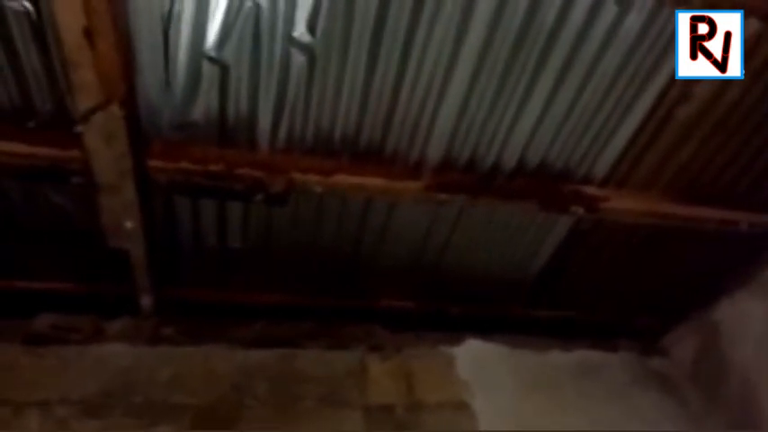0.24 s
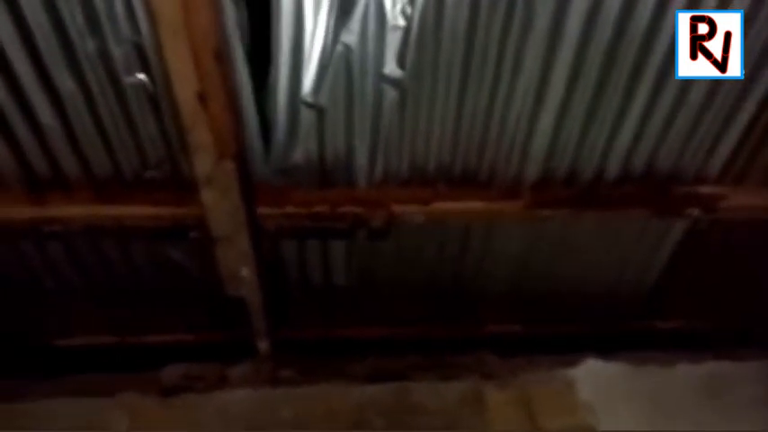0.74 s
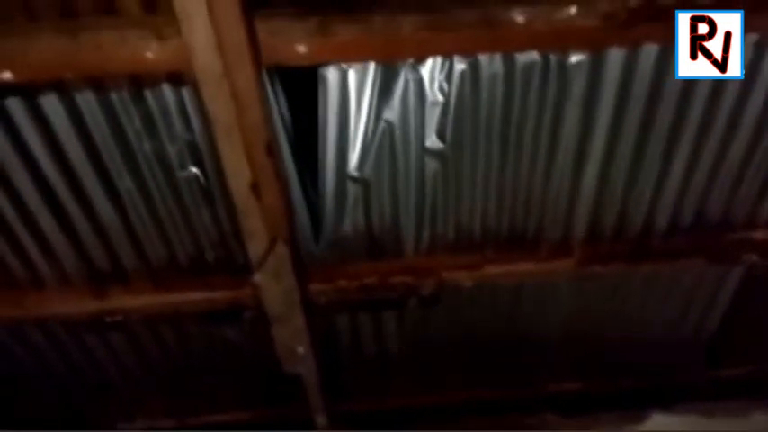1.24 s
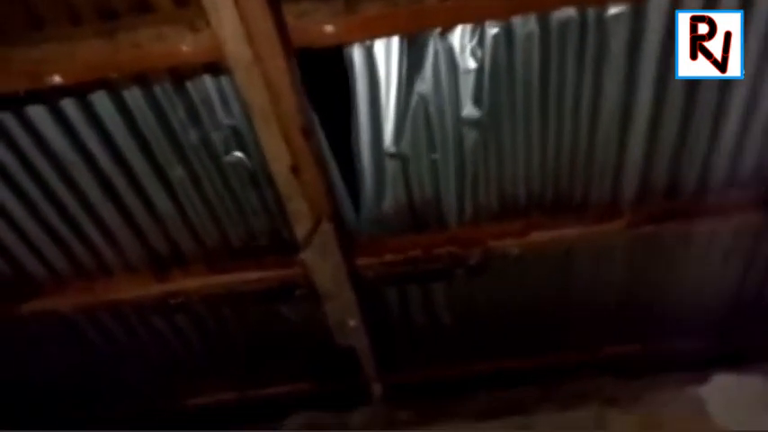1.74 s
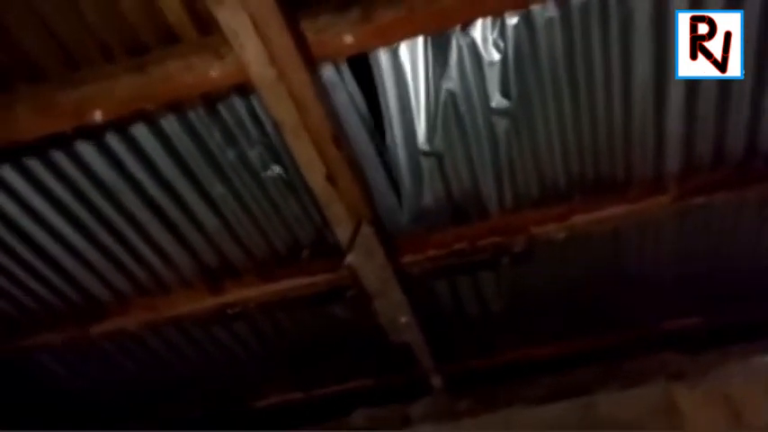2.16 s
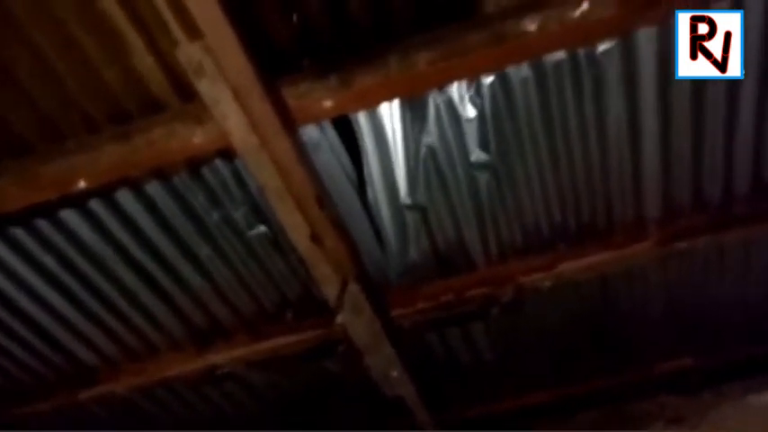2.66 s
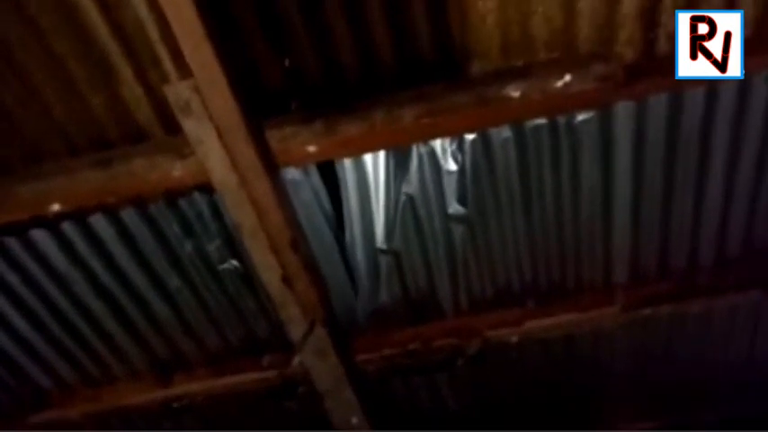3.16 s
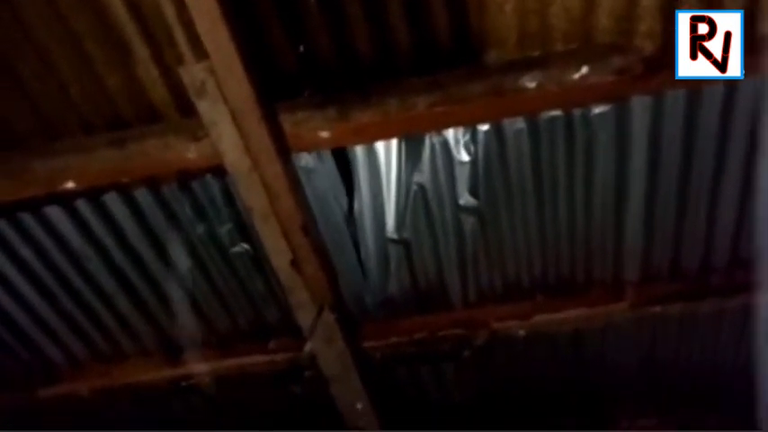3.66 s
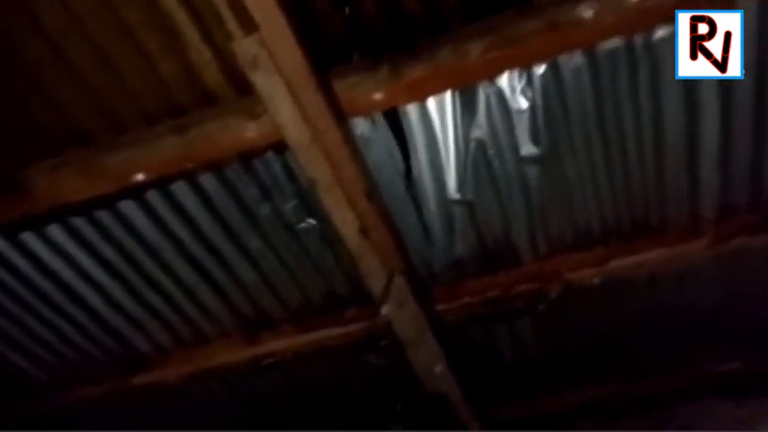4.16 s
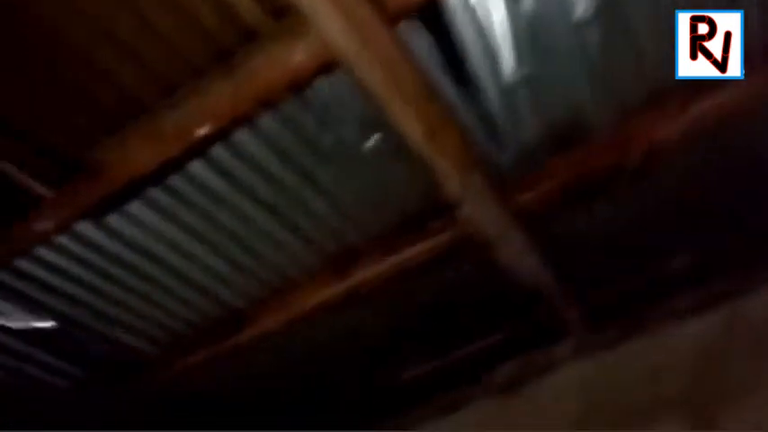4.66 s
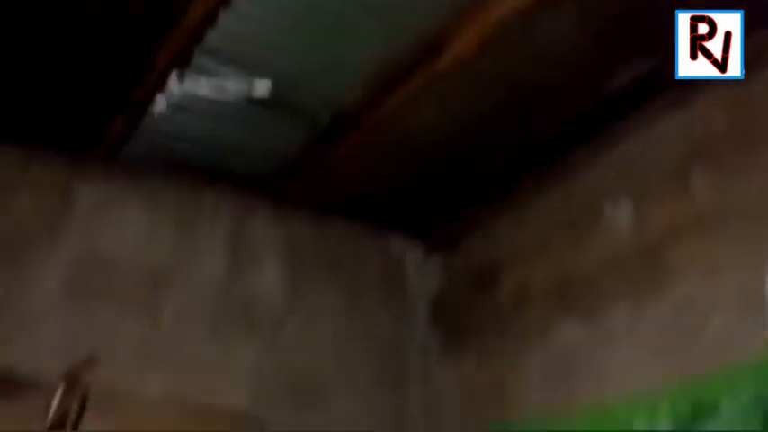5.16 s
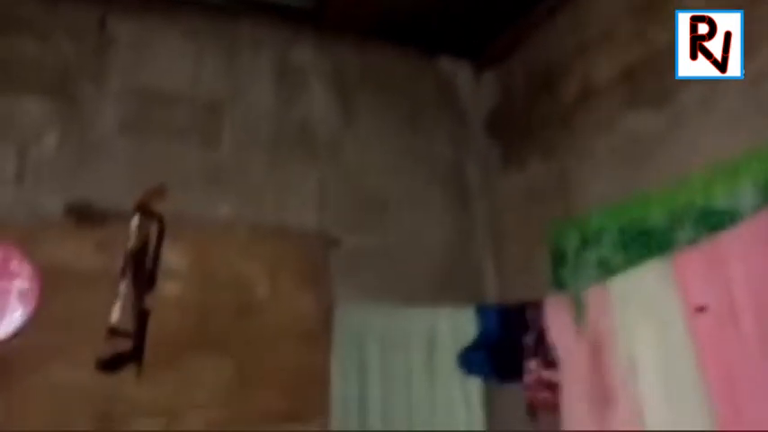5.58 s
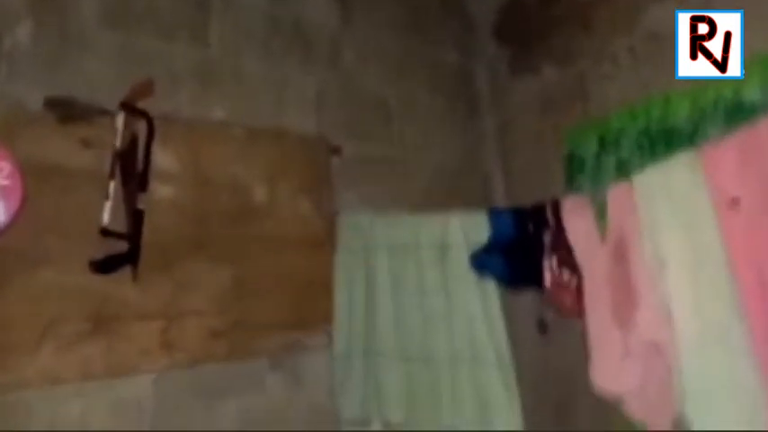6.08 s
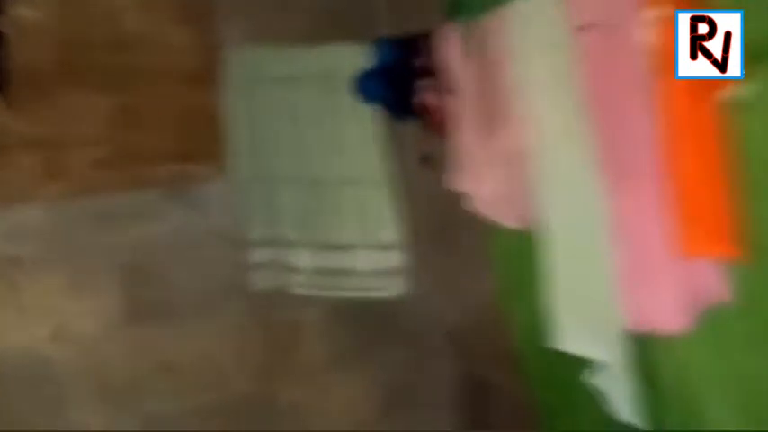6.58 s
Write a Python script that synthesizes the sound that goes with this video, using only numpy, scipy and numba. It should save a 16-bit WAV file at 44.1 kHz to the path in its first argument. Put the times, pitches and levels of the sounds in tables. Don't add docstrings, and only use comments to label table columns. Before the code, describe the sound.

A storm shakes a tin roof overhead. Uneven bursts of rain ring the thin metal and spray hisses, while wind hums low in the hard-walled room. Loose sheets flap, click, knock and bang in irregular clusters, busiest in the first two and a half seconds and around five seconds. Late on, a bending sheet groans very briefly before more sharp slaps. Close, short room echo and rough phone sound.

```python
import sys
import numpy as np
from scipy import signal
from scipy.fft import rfft, irfft, next_fast_len
from scipy.io import wavfile
from scipy.ndimage import uniform_filter1d, map_coordinates
from numba import njit

SR = 44100
rng = np.random.default_rng(int(sys.argv[2]) if len(sys.argv) > 2 else 0)


def int16_out(signal):
    q = np.round(np.clip(np.atleast_2d(signal).T, -1, 1) * 32767)
    wavfile.write(sys.argv[1], SR, q.astype(np.int16))


def convert_level_to_amplitude(level_db):
    exponent = np.asarray(level_db, float) / 20
    return 10 ** exponent


N = 301203

# peak_s, drumming_db, half_width_s, relative_brightness_db
SQUALLS = [(0.17, -32, 0.028, 3), (0.46, -22.5, 0.12, -1.5), (0.615, -21.5, 0.045, -2),
           (0.78, -21.5, 0.13, 1.2), (1.01, -20, 0.047, -5.5), (1.23, -25, 0.025, -14),
           (1.49, -21, 0.11, -0.3), (1.739, -19.5, 0.033, -3), (1.99, -21.5, 0.29, -1.5),
           (2.191, -18, 0.053, -2.5), (2.4, -20, 0.043, -4), (2.7, -26, 0.018, -13),
           (2.9, -26.5, 0.038, -0.5), (3.16, -28, 0.039, -3), (3.5, -23.5, 0.029, -4.5),
           (3.669, -24.5, 0.049, 2), (3.76, -22, 0.14, -7), (4.1, -24.5, 0.093, -2),
           (4.41, -22.5, 0.17, -3), (4.481, -22, 0.034, -1), (4.73, -29, 0.095, 2),
           (4.82, -21.5, 0.026, -3.5), (5.06, -17, 0.15, -3), (5.16, -21, 0.031, 1.5),
           (5.38, -24, 0.054, 0), (5.549, -25.5, 0.071, 1), (5.822, -22, 0.061, -2.5),
           (6.21, -22.5, 0.064, -7.5), (6.4, -21.5, 0.074, -6.5), (6.6, -19.5, 0.075, 0),
           (6.595, -20, .025, 2)]
# frequency_hz, density_db (dB per Hz)
DRUMMING = [(700, -21), (1000, -14.5), (1200, 0.5), (1600, -3.5), (1800, -4.5), (2050, -4.5), (2500, -6.5),
            (2850, -12.5), (3250, -22), (3750, -15), (4900, -27.5), (5600, -28), (7000, -28.5),
            (9000, -41.5)]
# frequency_hz, density_db (dB per Hz)
SPRAY = [(2500, -17.5), (3800, 6), (4900, -4.5), (5600, 0.5), (7000, -6), (9500, 0), (11700, -5.5),
         (12500, -11)]


def unit(x):
    return x / np.sqrt(np.mean(x ** 2) + 1e-20)


def along(points, hz):
    f, v = np.transpose(points)
    return np.interp(np.log(hz + 1), np.log(f + 1), v)


def wobble(rate_hz):
    knots = rng.standard_normal(int(N * rate_hz / SR) + 4)
    return map_coordinates(knots, [np.arange(N) * rate_hz / SR])


def filtered(x, response):
    m = next_fast_len(N + SR // 2)
    return irfft(rfft(x, m) * response(np.fft.rfftfreq(m, 1 / SR)), m)[..., :N]


def coloured(x, spectrum):
    return unit(filtered(x, lambda hz: convert_level_to_amplitude(along(spectrum, hz))))


def rush(patchy_db):
    z = signal.stft(rng.standard_normal(N + 512), nperseg=512)[2]
    field = uniform_filter1d(rng.standard_normal(z.shape), size=6, axis=0)
    field = uniform_filter1d(field, size=8, axis=1)
    return unit(signal.istft(z * convert_level_to_amplitude(patchy_db * unit(field)), nperseg=512)[1][:N])


def swells(base_db, peak_s, db, width_s, rise_share=.88):
    t = np.arange(0, N + 64, 64) / SR
    rise = np.clip(np.reshape(rise_share, (-1, 1)), .1, 1.9)
    u = (t - peak_s[:, None]) / np.clip(width_s, .01, 1)[:, None] + 1 - rise
    bells = convert_level_to_amplitude(2 * db) @ np.exp(-(u / np.where(u < 0, rise, 2 - rise)) ** 2)
    return 10 * np.log10(convert_level_to_amplitude(2 * base_db) + np.interp(np.arange(N) / SR, t, bells))


@njit
def add(out, start, step, fade, size, rise):
    for k in range(len(start)):
        for i in range(min(int(6 / fade[k]), len(out) - start[k])):
            envelope = size[k] * np.exp(-fade[k] * i) * (1 - np.exp(-i / rise))
            out[start[k] + i] += envelope * np.sin(step[k] * i)


def rings(start_s, hz, t60_s, size, attack_s):
    out = np.zeros(N)
    start = np.clip(start_s * SR, 0, N - 1).astype(np.int64)
    add(out, start, 2 * np.pi * hz / SR, np.log(1000) / (t60_s * SR), size, attack_s * SR)
    return out


def struck(start_s, db, hz, spread, t60_s, attack_s, count):
    detune, loud, life, delay = np.moveaxis(rng.standard_normal((len(start_s), count, 4)), 2, 0)
    detune[:, 0] = 0
    size = convert_level_to_amplitude(db[:, None] + 2.7 * loud - 5.4 * np.abs(detune)) / np.sqrt(count)
    late_s = start_s[:, None] + .004 * np.abs(delay)
    mode_hz = hz[:, None] * np.exp(spread * detune)
    mode_t60_s = t60_s * np.exp(0.34 * life)
    return rings(late_s.ravel(), mode_hz.ravel(), mode_t60_s.ravel(), size.ravel(), attack_s)


def bursts(start_s, db, t60_s, attack_s):
    t = np.arange(SR // 4) / SR
    out = np.zeros(N + len(t))
    for start, level, life in zip(start_s, db, t60_s):
        out[round(start * SR):][:len(t)] += convert_level_to_amplitude(level - 60 * t / life) * (1 - np.exp(-t / attack_s))
    return out[:N]


def drops(lo_hz, hi_hz, cycles, spread_db, count):
    when, pitch, life, big = rng.random((count, 4)).T
    hz = lo_hz + pitch * (hi_hz - lo_hz)
    t60_s = cycles * (0.3 + 3.6 * life) / hz
    size = convert_level_to_amplitude(-spread_db * np.log(big + 1e-4)) / np.sqrt(t60_s)
    return unit(rings(when * N / SR, hz, t60_s, size, attack_s=0.00012))


def rain():
    # time_s, strength_db
    downpour = [(0, -25), (.85, -24.5), (1.7, -29), (2.56, -28.5), (3.4, -30), (4.2, -29), (5.6, -30),
                (5.98, -25.5), (6.3, -27), (6.7, -30.5), (6.83, -26.5)]
    # middle_s (of the whole surge), level_db, half_width_s, rise_share (of
    splashes = [(0.31, -38, 0.033, 0.8), (0.47, -35, 0.058, 0.61), (0.6, -31, 0.025, 0.15),
                (0.79, -32.6, 0.1, 1), (1.0, -37, 0.053, 0.68), (1.49, -32, 0.036, 0.8),
                (1.49, -36.5, 0.087, 0.8), (1.95, -38.5, 0.23, 0.71), (2.23, -31.5, 0.065, 0.94),
                (2.7, -44.5, 0.029, 0.8), (2.87, -43.5, 0.05, 0.59), (3.14, -47.5, 0.027, 0.35),
                (3.38, -45.5, 0.032, 0.8), (3.66, -42, 0.06, 0.35), (4.06, -43.5, 0.06, 0.35),
                (4.3, -44.5, 0.059, 0.88), (4.46, -38.5, 0.026, 0.87), (4.55, -43.5, 0.074, 0.87),
                (5.079, -37, 0.13, 0.7), (5.16, -33, 0.038, 0.78), (5.371, -38.5, 0.035, 0.29),
                (5.55, -43.5, 0.085, 0.8), (5.84, -37, 0.049, 0.35), (6.16, -44, 0.016, 0.35),
                (6.2, -48, 0.2, 1), (6.4, -43, 0.058, 0.88), (6.58, -40.5, 0.035, 0.99),
                (6.785, -46.5, 0.023, 0.73)]
    # peak_s, level_db, half_width_s
    heaves = [(.12, -35.5, .2), (.5, -37, 0.11), (1.2, -34, 0.072), (2.6, -35, .06), (0.75, -34, 0.29),
              (1.03, -31, 0.049), (1.76, -28.5, 0.08), (2.03, -32.5, 0.11), (2.17, -27.5, 0.035),
              (2.4, -34, .036), (2.87, -35, .048), (3.69, -28.5, 0.048), (3.76, -29, 0.18),
              (4.3, -33.5, 0.37), (4.85, -30, 0.068), (5.04, -27, 0.1), (6.14, -31.5, 0.082),
              (6.61, -29, 0.063)]
    # frequency_hz, density_db (dB per Hz)
    panel_colour = [(150, -18), (220, -1), (400, 2.5), (700, 3.5), (1050, 5), (1500, -33)]

    steady_db = np.interp(np.arange(N) / SR, *np.transpose(downpour))
    peak_s, db, width_s, bright_db = np.transpose(SQUALLS)
    dull_db = swells(steady_db, peak_s, db, width_s)
    sharp_db = swells(steady_db - 3, peak_s, db + bright_db, width_s)
    spray_db = swells(-50 + (steady_db + 28), *np.transpose(splashes))
    panel_db = swells(-35 + 0.27 * (dull_db + 26), *np.transpose(heaves))
    flurry = wobble(28)

    ringing = drops(800, 7200, cycles=130, spread_db=2.0, count=24000)
    taps = drops(800, 7200, cycles=3.5, spread_db=1.03, count=16000)
    taps = convert_level_to_amplitude(.3 * (dull_db + 24)) * taps
    drum = coloured(.75 * ringing + .42 * taps + .75 * rush(patchy_db=-0.55), DRUMMING)
    dull = filtered(drum, lambda f: 1 / (1 + (f / 1800) ** 8))
    drum = unit(dull) * convert_level_to_amplitude(dull_db - 0.98) + unit(drum - dull) * convert_level_to_amplitude(sharp_db - 0.58)

    body = .4 * drops(199.5, 1201, cycles=34, spread_db=1.5, count=3000)
    body = coloured(body + .9 * rush(patchy_db=-1.2), panel_colour)
    spray = .45 * drops(3300, 12850, cycles=60, spread_db=-1.0, count=20000)
    spray = coloured(spray + 1.1 * rush(patchy_db=-1.5), SPRAY)

    mix = drum * convert_level_to_amplitude(.25 * flurry)
    mix += spray * convert_level_to_amplitude(spray_db + 1.5 * flurry + 7.0)
    return mix + body * convert_level_to_amplitude(panel_db + 0.31 * flurry - 1.5)


def lulls():
    # end_s, depth_db, length_s
    sags = [(.579, 6, .016), (1.383, 2, .03), (2.128, 2, .025), (2.365, 2, .03), (3.126, 3, .015),
            (3.63, 1.5, .03), (4.688, 5, .015), (5.1, 2, .015), (5.778, 1.5, .03), (6.49, 3, .03)]
    # start_s, depth_db, length_s
    breaks = [
        (.855, 2.5, .05),
        (5.197, 4, .04),
        (6.68, 2, .08),
        (4.838, 2, .03),
    ]
    t = np.arange(N) / SR

    def dip(s, db, length):
        return db * np.exp(-((t - s) / length) ** 2)

    depth_db = sum(dip(*row) * (t < row[0]) for row in sags)
    depth_db = depth_db + sum(dip(*row) * (t > row[0]) for row in breaks)
    return convert_level_to_amplitude(-uniform_filter1d(depth_db, size=200))


def wind():
    # frequency_hz, density_db (dB per Hz)
    rumble = [(14, -26), (30, -20), (60, -7), (100, -12.5), (200, -14.5), (400, -13.5), (900, -16),
              (1500, -39.5)]
    # centre_hz, width_hz, gain_db
    room_modes = [(116, 15, 11), (167, 36, 11), (349.3, 6.4, 9)]
    # pitch_hz, relative_db, wander_hz
    hum_tones = [(121.8, -8.5, 5.61), (100.2, -9.5, 5.99), (169.5, -14, 2.83), (355, -18, 3.5),
                 (610.7, -15, 4.08)]

    def resonance(f):
        peaks = sum(convert_level_to_amplitude(2 * db) / (1 + (2 * (f - c) / w) ** 2) for c, w, db in room_modes)
        return np.sqrt(1 + peaks)

    drone = unit(filtered(coloured(rush(patchy_db=0.56), rumble), resonance))
    hum = np.zeros(N)
    for hz, db, wander_hz in hum_tones:
        turns = np.cumsum(hz + wander_hz * wobble(12)) / SR
        hum += convert_level_to_amplitude(db + 2.0 + 3 * wobble(4)) * np.sin(2 * np.pi * turns)
    gust_db = swells(-27.0, *np.transpose(SQUALLS)[:3])
    level_db = -35 + 0.23 * (np.arange(N) - N / 2) / SR
    level_db = level_db + 0.74 * wobble(2.0) - .15 * (gust_db + 22)
    return convert_level_to_amplitude(level_db) * (0.99 * drone + hum)


def clangs():
    # start_s, peak_db, pitch_hz, t60_s
    clear_rings = [(1.714, -11, 1800, 0.095), (1.716, -15.5, 2790, 0.086), (5.1, -16, 1130, 0.061),
                   (1.6, -20, 330, 0.056), (1.72, -22, 780, 0.043), (3.6, -10, 1800, 0.051),
                   (6.7, -16, 2100, 0.049), (5.002, -9, 454, 0.038), (5.003, -10, 350, 0.039),
                   (5.048, -7.5, 450, 0.033), (5.3, -20, 250, 0.08), (0.0497, -28, 169, 1)]
    s, db, hz, t60_s = np.transpose(clear_rings)
    return rings(s, hz, t60_s, convert_level_to_amplitude(db), attack_s=0.0044)


def ticks():
    # start_s, peak_db
    tick_rows = [(0.0682, -26.5), (0.1526, -25.5), (0.484, -19), (0.5806, -22), (0.7253, -20),
                 (0.7654, -19), (0.833, -15), (0.9418, -28), (1.1039, -32), (1.4533, -17.5), (1.596, -23),
                 (2.809, -31), (3.1278, -26.5), (3.5877, -25), (3.631, -31), (3.701, -24), (3.9926, -26.5),
                 (4.0735, -25.5), (4.1999, -28), (4.4313, -31), (4.7785, -30), (4.982, -20.5), (5.356, -20),
                 (5.7808, -21), (6.1504, -24.5), (6.771, -32)]
    s, db = np.transpose(tick_rows)
    metal = struck(s, db, np.full(len(s), 10000.), spread=0.17, t60_s=0.054, attack_s=0.0012, count=30)
    water = bursts(s, db - 7.5, np.full(len(s), .05), attack_s=.001)
    return metal + water * coloured(rng.standard_normal(N), SPRAY)


def slapped(rows, treble_db):
    s, db, hz = np.transpose(rows)
    t60_s = np.full((len(s), 1), .085)
    clang = struck(s, db - 8.5, hz, spread=.12, t60_s=1.4 * t60_s, attack_s=0.0027, count=9)
    crash = bursts(s, db - 13.5, t60_s[:, 0], attack_s=0.0044)
    crash = crash * coloured(rng.standard_normal(N), DRUMMING)
    treble = struck(s, db + treble_db - 10.0, np.full(len(s), 4400.), spread=0.22, t60_s=t60_s,
                    attack_s=0.0027, count=16)
    return clang + crash + treble


def slaps():
    # start_s, peak_db, loudest_ring_hz
    edge_rows = [(0.1317, -17, 1310), (0.58, -17, 1260), (0.7258, -8, 1347), (0.7751, 1, 1180),
                 (1.3865, -3.5, 1635), (1.6467, -13, 1265), (2.1282, -5.5, 1310), (3.028, -18, 1200),
                 (4.1092, -6.5, 1168), (4.2562, -12, 1454), (4.4077, -13, 1440), (4.6887, -4.5, 1154),
                 (4.9022, -10, 1495), (5.0108, -3, 1250), (5.3584, -4.5, 1540), (5.5234, -4.5, 1460),
                 (5.701, -12, 1395), (5.7794, -3.5, 1296), (6.3672, -8, 1365), (6.547, -9.5, 1460),
                 (6.584, -3, 2033), (6.632, -7, 1760), (2.168, -5.5, 1204), (2.197, -6, 1200)]
    # start_s, peak_db, loudest_ring_hz
    flap_rows = [(0.4833, -10, 1260), (1.1015, -8, 1188), (1.1633, -14, 1190), (1.276, -16, 1420),
                 (1.482, -5.5, 1453), (1.572, -12, 1192), (2.0073, -3, 2070), (2.367, -0.5, 1477),
                 (2.6272, -11, 1970), (2.6911, -14, 1230), (2.737, -16, 1470), (3.465, -10, 2150),
                 (3.5724, -12, 1460), (3.7224, -5.5, 1230), (3.7688, -5.5, 1352), (3.845, -12.5, 1520),
                 (3.919, -8.5, 1234), (4.0683, -21, 1370), (4.3642, -6.5, 1117), (4.4453, -3.5, 2170),
                 (5.1046, -6, 1254), (5.899, -6.5, 1400), (5.9858, -3.5, 1394), (6.178, -8, 1220),
                 (6.2538, -9.5, 1490), (6.6983, -7.5, 1310)]
    return slapped(edge_rows, treble_db=-9.5) + slapped(flap_rows, treble_db=-21.5)


def knocks():
    # start_s, peak_db
    knock_rows = [(0.316, -12), (0.418, -12), (0.4878, -13), (0.5013, -16), (0.5422, -9), (0.5801, -9),
                  (0.697, -9), (0.7758, -7), (0.8699, -14.5), (0.9423, -13), (1.011, -14), (1.4043, -12),
                  (1.449, -9), (1.505, -5), (1.5723, -14), (1.701, -12), (1.717, -8), (1.887, -15),
                  (1.9121, -10), (1.953, -11), (1.9745, -9), (2.0063, -13), (2.1211, -13), (2.1693, -7),
                  (2.197, -6), (2.354, -13), (2.365, -12), (2.6278, -17), (3.1103, -18), (3.1685, -18),
                  (3.4655, -19), (3.6394, -14), (3.8985, -18), (4.3091, -15), (4.3465, -19), (4.366, -8.5),
                  (4.4177, -16), (4.4493, -9), (4.6907, -13), (4.7185, -12), (4.814, -12), (4.82, -13),
                  (4.8984, -15), (4.9062, -12), (4.957, -12), (4.963, -7), (4.9938, -8), (5.1236, -9),
                  (5.3535, -8.5), (5.525, -16), (5.5253, -13.5), (5.5677, -11), (5.7, -19), (6.3814, -13),
                  (6.568, -7), (6.5832, -4)]
    # frequency_hz, density_db (dB per Hz)
    knock_colour = [(600, -17.5), (1200, -1), (2500, -0.5), (3250, -13.5), (3800, -10), (5000, -19),
                    (9000, -23.5)]
    s, db = np.transpose(knock_rows)
    contour = bursts(s, db - 4, np.full(len(s), .014), attack_s=.0004)
    return contour * coloured(rng.standard_normal(N), knock_colour)


def bangs():
    # start_s, peak_db, ring_hz, t60_s
    bang_rows = [(1.699, -27, 510, 0.066), (1.758, -18, 320, 0.07), (2.145, -8, 547, 0.058),
                 (2.17, -14, 850, 0.07), (3.635, -10, 726, 0.048), (3.68, -16, 267, 0.091),
                 (3.699, -18, 537, 0.06), (3.837, -19, 650, 0.05), (4.503, -21, 624, 0.048),
                 (5.003, -8.5, 293, 0.06), (5.02, -12, 240, .06), (5.051, -17, 442, 0.055),
                 (5.697, -19, 342, 0.043), (6.135, -21, 640, 0.07), (6.597, -15, 560, 0.063),
                 (6.635, -12, 580, 0.076)]
    # frequency_hz, density_db (dB per Hz)
    thud_colour = [(150, -27), (240, -3), (500, -2), (1000, -1), (1600, -27)]
    s, db, hz, t60_s = np.transpose(bang_rows)
    ring_t60_s = np.clip(t60_s, .02, .3)[:, None]
    ring = struck(s, db - 5.5, hz, spread=0.2, t60_s=ring_t60_s, attack_s=0.002, count=14)
    thud = bursts(s, db - 14.5, 1.2 * t60_s, attack_s=.003)
    return ring + thud * coloured(rng.standard_normal(N), thud_colour)


def groans():
    # start_s, length_s, level_db, from_hz, to_hz
    bends = [
        (6.085, .1, -29, 555, 655),
    ]
    out = np.zeros(N)
    for s, length, db, from_hz, to_hz in bends:
        u = np.arange(round(length * SR)) / (length * SR)
        turns = np.cumsum(from_hz + (to_hz - from_hz) * u) / SR
        out[round(s * SR):][:len(u)] += convert_level_to_amplitude(db) * np.sin(np.pi * u) ** .5 * np.sin(2 * np.pi * turns)
    return out * convert_level_to_amplitude(2.9 * wobble(60))


def room(x):
    # frequency_hz, t60_s
    decay = [(200, 0.17), (2000, 0.61), (10000, 0.23)]
    hz, t, z = signal.stft(rng.standard_normal(SR // 2), SR, nperseg=256)
    tail = signal.istft(z * convert_level_to_amplitude(-60 * t / along(decay, hz)[:, None]), SR, nperseg=256)[1]
    return signal.fftconvolve(np.pad(x, (200, 0)), tail / np.linalg.norm(tail))[:N]


def scene():
    wet = rain() * lulls()
    air = wind()
    metal = clangs() + ticks() + slaps() + knocks() + bangs() + groans()
    return (wet + metal + convert_level_to_amplitude(-7) * room(metal) + air)[None]


def microphone(x):
    # centre_hz, width_hz, depth_db
    port = [(7950, 756, 25.5), (10653, 427, 22.5), (4935, 210, 3), (1785, 54, 4.5), (152, 7.2, 12),
            (183.8, 7.3, 10.5)]

    def response(f):
        port_db = -sum(db * np.exp(-np.abs((f - hz) / w) ** 3) for hz, w, db in port)
        edge_db = -np.clip(f - 12370, 0, None) / 14
        return convert_level_to_amplitude(port_db) * convert_level_to_amplitude(edge_db) * (f < 12900) * (f > 16)

    return filtered(x, response)


def masked(x, slope_db, empty_db, scatter_db):
    # frequency_hz, under_masking_db
    fine = [(300, 34), (1100, 24), (1800, 8), (2600, 6), (3250, 9), (3900, 3), (4900, 5), (6000, 3),
            (9000, 4), (13000, 6)]
    # band_hz, half_width_hz, moments_s
    openings = [
        (7850, 420, [.17, .23, 1.33, 2.86, 2.98, 3.16, 3.29, 3.37, 4.1, 4.64, 5.13, 5.43, 5.87, 6.785]),
        (10650, 300, [.58, 1.45, 3.13, 3.37, 3.59, 4.0, 5.77, 5.85, 6.15]),
        (12700, 200, [.14, .58, 1.07, 1.2, 2.48, 2.58, 2.64, 2.9, 3.13, 3.76, 4.12, 5.78]),
    ]

    n, k = np.arange(2048)[:, None], np.arange(1024)
    window = np.sin(np.pi * (n + .5) / 2048)
    basis = window * np.cos(np.pi / 1024 * (n + 512.5) * (k + .5)) / np.sqrt(512)
    at = np.arange(N // 1024 + 3)[:, None] * 1024 + np.arange(2048)
    bands = (np.pad(x, (1424, 3072))[at] @ basis).reshape(len(at), 128, 8)
    level = np.log10(np.mean(bands ** 2, axis=2) + 1e-20) * 10

    place = np.arange(128)
    band_hz = (place + .5) * SR / 256
    cover = np.max(level[:, None] - slope_db * np.abs(place[:, None] - place), axis=2)
    step_db = cover - along(fine, band_hz)

    luck = rng.standard_normal(level.shape)
    stray = rng.random(level.shape) < .003
    frame_s = (at[:, 1024:1025] - 1424) / SR
    for hz, width_hz, moments in openings:
        opened = np.abs(frame_s - moments).min(axis=1) < .014
        inside = np.abs(band_hz - hz) < width_hz
        stray = stray | (opened[:, None] & inside & (luck > -.3))

    step = np.where(stray, convert_level_to_amplitude(level + 1.5), convert_level_to_amplitude(step_db))[..., None]
    kept = stray | (level + scatter_db * luck > step_db - empty_db)
    coarse = np.sign(bands) * np.floor(np.abs(bands) / step + .36) * step * kept[..., None]
    frames = coarse.reshape(len(at), 1024) @ basis.T
    return np.bincount(at.ravel(), frames.ravel())[1424:N + 1424]


def top_cut(x):
    return signal.sosfilt(signal.butter(12, 13710, fs=SR, output="sos"), x)


def record(dry):
    x = dry[0] / (1 + np.abs(dry[0] / 0.57) ** 4) ** (1 / 4)
    x = masked(microphone(x), slope_db=2.5, empty_db=2.0, scatter_db=2.0)
    return top_cut(x[None])


dry = scene()
out = record(dry)
int16_out(out)
```